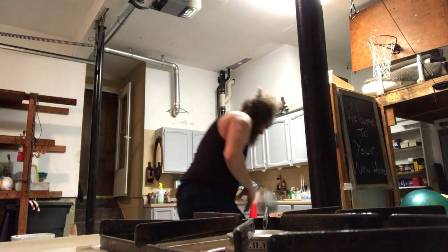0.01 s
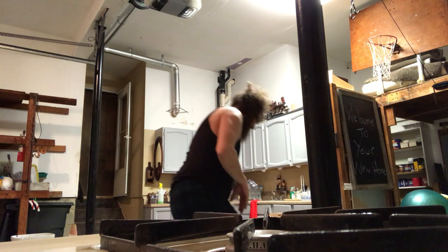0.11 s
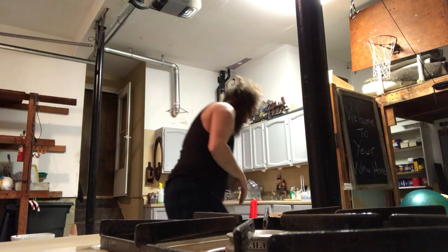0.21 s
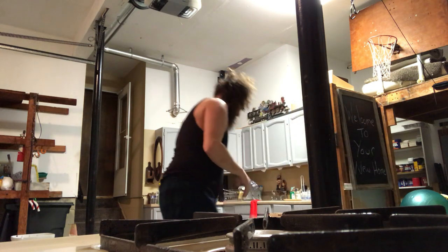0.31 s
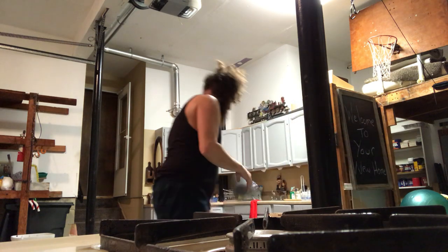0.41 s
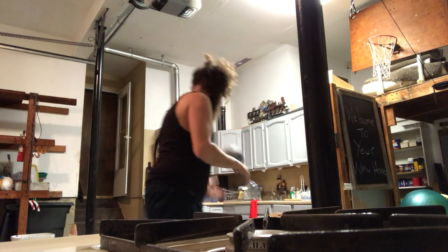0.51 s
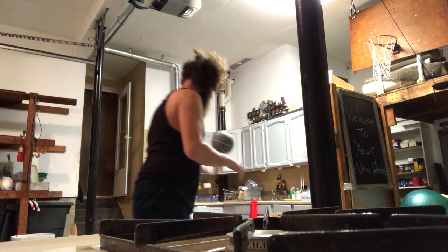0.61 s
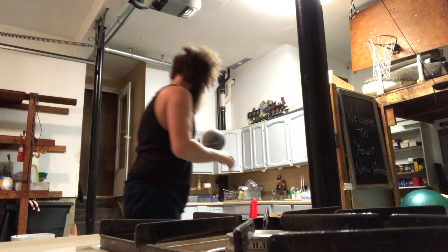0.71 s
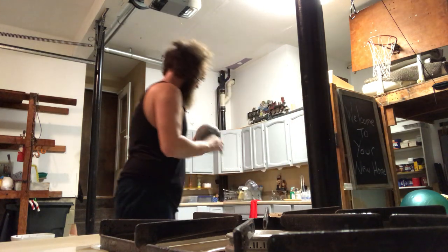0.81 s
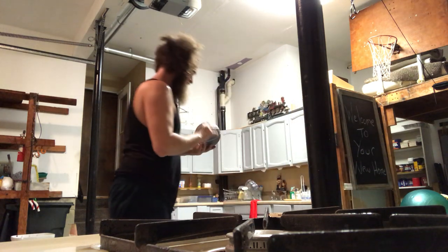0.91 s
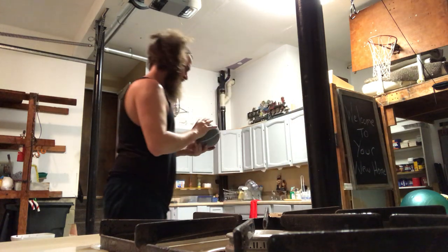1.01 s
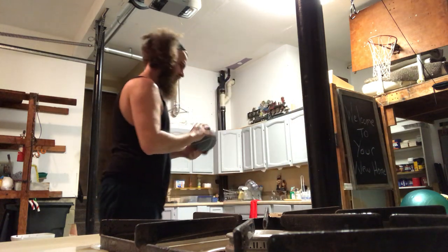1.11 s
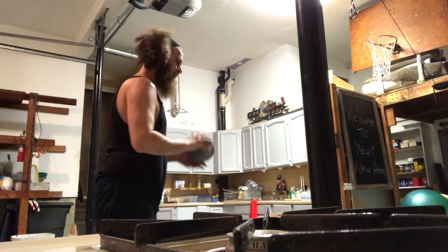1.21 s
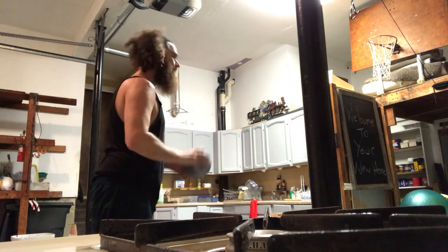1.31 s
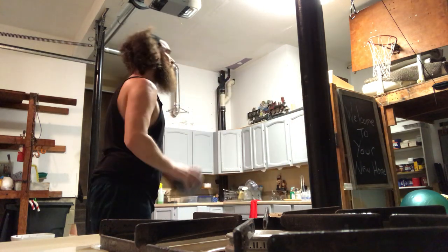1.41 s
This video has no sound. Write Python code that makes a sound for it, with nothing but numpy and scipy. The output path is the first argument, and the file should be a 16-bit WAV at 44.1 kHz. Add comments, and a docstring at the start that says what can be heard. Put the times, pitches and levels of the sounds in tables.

```python
"""Garage with hard walls, one microphone: a small rubber ball bounces once on the concrete floor.
The air and skin of the ball ping as damped modes over a noise crack and a low thump; the walls ring on
as decaying coloured noise. Soft shaped noises, each with a room tail, are scuffs of shoes and hands, the
dull tail of an earlier tap and a tiny high tick. A motor hums low, as two drifting tones and a few fuzzy
ones, over a faint air noise."""
import sys
import numpy as np
from scipy import signal
from scipy.fft import rfft, irfft, next_fast_len
from scipy.io import wavfile
from scipy.ndimage import uniform_filter1d, map_coordinates

SR = 44100
rng = np.random.default_rng(int(sys.argv[2]) if len(sys.argv) > 2 else 0)


def volts(x):
    """Linear amplitude factor 10**(x/20) for a level x in dB, scalar or array-like."""
    e = np.asarray(x, float) / 20
    return 10 ** e


def master(y):
    """Save y as 16-bit WAV."""
    cut = np.clip(np.atleast_2d(y).T, -1, 1)
    pcm = np.round(cut * 32767)  # scale
    wavfile.write(sys.argv[1], SR, pcm.astype(np.int16))


N = 66150  # samples, 1.5 s


def unit(x):
    """Scale to rms 1."""
    return x / np.sqrt(np.mean(x ** 2) + 1e-20)


def along(points, hz):
    """Interpolate (f/Hz, value) points on a log frequency axis."""
    f, v = np.transpose(points)
    return np.interp(np.log(hz + 1), np.log(f + 1), v)


def wobble(rate):
    """A smooth random curve through normal random knots, rate knots a second."""
    knots = rng.standard_normal(int(N * rate / SR) + 4)
    return map_coordinates(knots, [np.arange(N) * rate / SR])


def filtered(x, response):
    """Shape x by a response of frequency in Hz."""
    m = next_fast_len(len(x) + 8192)
    spectrum = rfft(x, m) * response(np.fft.rfftfreq(m, 1 / SR))
    return irfft(spectrum, m)[:len(x)]


def room_tail(colour, hold):
    """One second of coloured noise: each frequency holds, then dies at its own speed."""
    # decay of the garage: f/Hz, time to fall 60 dB t60/s
    decay_times = [(250, 0.68), (600, 0.39), (1400, 0.71), (2500, 0.51), (5000, 0.55), (9000, 0.44),
                   (15000, 0.248)]
    noise = unit(filtered(rng.standard_normal(SR), colour))
    hz, t, z = signal.stft(noise, SR, nperseg=256)
    since_hold = np.maximum(t - along(hold, hz)[:, None], 0)
    decay = volts(-60 * since_hold / along(decay_times, hz)[:, None])
    return signal.istft(z * decay, SR, nperseg=256)[1][:SR]


def ring(hz, db, t60, attack_s, t):
    """A damped mode: a sine from t = 0 that swells exponentially and falls 60 dB in t60 seconds."""
    t = np.maximum(t, 0)
    return volts(db - 60 * t / t60) * np.sin(2 * np.pi * hz * t) * (1 - np.exp(-t / attack_s))


def near_surface(hz):
    """A near surface doubles the walls' answer: one delayed copy combs its middle frequencies."""
    comb_hz, share = 158.7, 0.86  # spacing of the comb, strength of the copy
    low_hz, top_hz = 464, 1550
    copy = share / (1 + (hz / top_hz) ** 4) / (1 + (low_hz / (hz + 1)) ** 8)
    return 1 + copy * np.exp(-2j * np.pi * hz / comb_hz)


def wall_answer():
    """The hard walls return the bounce as a swelling, then decaying, coloured noise."""
    # colour of the bounce in the walls: f/Hz, relative level/dB
    wall_colour = [(180, -47.5), (250, -7.5), (310, -10), (400, -10.5), (574, -15), (890, -17), (980, -12),
                   (1150, -12), (1450, -10), (1800, -9), (2200, -9.5), (2600, -17), (3240, -22),
                   (4200, -22), (5000, -29), (6900, -31.5), (10000, -41), (16000, -50)]
    # echoes keep arriving before the decay: f/Hz, hold t/s
    wall_hold = [(500, 0.007), (2000, 0.0067), (6000, 0.013), (14000, 0.056)]
    tail_db, swell_s = -23, 0.0072
    tail = room_tail(lambda hz: volts(along(wall_colour, hz)) * near_surface(hz), wall_hold)
    swell = 1 - np.exp(-np.arange(SR) / SR / swell_s)
    return volts(tail_db) * tail * swell


def bounce():
    """Ball modes ping, the contact cracks, floor and room modes thump, then the walls answer."""
    # air and skin of the ball: f/Hz, relative level/dB, t60/s
    ball_modes = [(1120, -17, 0.0074), (1334, -24.5, 0.044), (1556, -1, 0.011), (2240, -1.5, 0.018),
                  (2336, -6.5, 0.028), (3340, -1.5, 0.0041), (4030, -7.5, 0.0097), (4570, -5, 0.0067),
                  (6220, -13.5, 0.0074), (8664, -33, 0.0044)]
    # floor and lowest room resonances: f/Hz, level/dB, t60/s, swell t/s
    floor_modes = [(82, -44.5, .08, 0.0098), (120.4, -10, 0.083, .005), (140.8, -21, 0.32, 0.049),
                   (189.4, -19, 0.24, 0.0052), (214.8, -26, 0.48, 0.022), (234.8, -28.5, 0.52, 0.017)]
    bounce_s, ball_db, attack_s = .2441, -11, 0.00044
    crack_db, crack_t60_s = -26, 0.012  # level ahead of the noise colour
    thump_lag_s, bass_cut_hz = 0.00274, 45

    t = np.arange(N) / SR - bounce_s
    ping = sum(ring(hz, ball_db + db, t60, attack_s, t) for hz, db, t60 in ball_modes)

    crack_decay = (t > 0) * volts(crack_db - 60 * np.abs(t) / crack_t60_s)
    crack_noise = filtered(rng.standard_normal(N), lambda hz: hz / (hz + 3000) / (1 + (hz / 7000) ** 2))
    crack = crack_decay * crack_noise

    # first swing opposite to the ping
    thump = -sum(ring(hz, db, t60, swell, t - thump_lag_s) for hz, db, t60, swell in floor_modes)

    walls, start = np.zeros(N + SR), round(bounce_s * SR)
    walls[start:start + SR] = wall_answer()
    bass_cut = signal.butter(4, bass_cut_hz, "high", fs=SR, output="sos")
    return signal.sosfilt(bass_cut, ping + crack + thump + walls[:N])


def soft_noises():
    """Scuffs, the dull tail of an earlier tap, a tiny high tick: rough noise that swells and fades."""
    # soft noises: start t/s, length t/s, level/dB (rms of the noise at its fullest), tilt/(dB per octave)
    noises = [(-.1, 0.053, -55, -15), (-.09, .12, -50, 2.5), (0.504, 0.013, -61, 8), (0.483, 0.096, -57, 0),
              (0.752, 0.1, -63.5, -3), (0.883, 0.14, -53, -0.13)]
    # their shared colour ahead of the tilt: f/Hz, relative level/dB per Hz
    noise_colour = [(500, -37), (1000, -0.5), (1500, -1), (2200, -0.5), (3000, -2), (4000, 3), (4600, 2),
                    (5600, 0), (7000, 0.2), (8000, -5), (10000, -8), (12000, -12.5), (16000, -11.5)]
    rise, rounding = .5, .65  # share of the length spent rising; exponent that rounds the top
    rough_db, wet_db = 2, -3.3
    lead = SR // 4  # time ahead of zero, for noises already under way
    t, out = (np.arange(N + lead) - lead) / SR, 0
    for start_s, length_s, db, tilt_db in noises:
        u = (t - start_s) / length_s
        swell = np.clip(np.minimum(u / rise, (1 - u) / (1 - rise)), 0, 1) ** rounding
        grit = volts(rough_db * unit(uniform_filter1d(rng.standard_normal(len(t)), size=60)))
        rough = grit * rng.standard_normal(len(t))
        coloured = unit(filtered(
            rough, lambda hz: volts(along(noise_colour, hz) + tilt_db * np.log2((hz + 1) / 4000))))
        direct = volts(db) * swell * coloured
        tail = room_tail(lambda hz: 1 + 0 * hz, [(1000, 0.044)])  # white, 44 ms hold throughout
        wet = signal.fftconvolve(direct, tail / np.linalg.norm(tail))[:len(t)]
        out = out + direct + volts(wet_db) * wet
    return out[lead:]


def motor():
    """A low hum that drifts a little, its octave that swells and sinks, and fuzzy noise-band tones."""
    # hum's octave: t/s, rms level/dB
    octave_level = [(0, -56), (.08, -73), (.2, -57.5), (.45, -60.5), (.6, -55), (.68, -66), (0.768, -50.5),
                    (0.848, -54), (.92, -81), (1.02, -73), (1.11, -50.5), (1.2, -56), (1.3, -60),
                    (1.5, -58)]
    # fuzzy motor tones: f/Hz, width f/Hz, rms level/dB
    fuzzy_tones = [(186.2, 12, -65), (229.2, 12, -62.5), (290.6, 9.2, -80), (147, 9.3, -69)]
    hum_hz, drift_hz = 59.0, .4
    hum_db, waver_db = -48.5, 1.4  # rms level and its random wavering

    phase = 2 * np.pi * (np.cumsum(hum_hz + drift_hz * wobble(6.5)) / SR + rng.random())
    octave_db = np.interp(np.arange(N) / SR, *np.transpose(octave_level))
    hum = volts(hum_db + waver_db * wobble(10)) * np.sin(phase)
    octave = volts(octave_db) * np.sin(2 * phase + wobble(5.5))
    whirs = 0
    for hz, width, db in fuzzy_tones:
        band = filtered(rng.standard_normal(N), lambda f: 1 / (1 + (2 * (f - hz) / width) ** 2))
        whirs = whirs + volts(db) * unit(band)
    return np.sqrt(2) * (hum + octave) + whirs  # sqrt(2): a sine of rms 1


def air():
    """Faint steady air noise: random noise, strongest in the bass."""
    # colour of the air: f/Hz, relative level/dB per Hz
    air_colour = [(20, -48.5), (42, -18.5), (65, -12.5), (82, -17), (95, -9.5), (134, -10.5), (166, -23),
                  (229, -13.5), (516, -25), (1100, -32), (2100, -33.5), (2600, -38.5), (4030, -41),
                  (4740, -45), (7000, -47.5), (9000, -53.5), (16000, -56)]
    air_db = -58  # rms
    return volts(air_db) * unit(filtered(rng.standard_normal(N), lambda hz: volts(along(air_colour, hz))))


def scene():
    """Everything adds up at one microphone."""
    return (bounce() + soft_noises() + motor() + air())[None]


def microphone(x):
    """The microphone's narrow dips and its band limit shape the spectrum."""
    # dips: f/Hz, width f/Hz, depth (share of the amplitude)
    narrow_dips = [(4950, 200, .6), (10400, 450, .55)]
    top_hz = 15780

    def response(f):
        gains = [1 - depth / (1 + (2 * (f - hz) / width) ** 2) for hz, width, depth in narrow_dips]
        return (f < top_hz) * np.prod(gains, axis=0)
    return filtered(x, response)


def roll_off(x):
    """The treble ends steeply here."""
    return signal.sosfilt(signal.butter(12, 16250, fs=SR, output="sos"), x)


def record(dry):
    """Pass the scene through the microphone to the finished mix."""
    mix = microphone(dry[0])[None]
    return roll_off(mix)


dry = scene()
out = record(dry)
master(out)
```